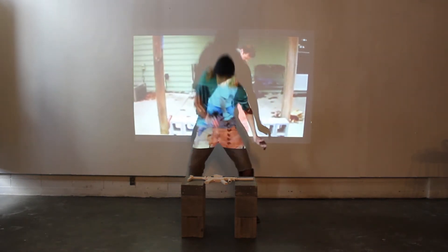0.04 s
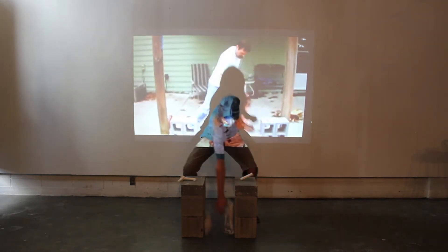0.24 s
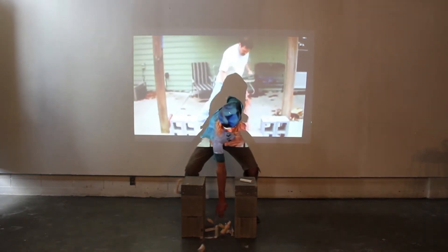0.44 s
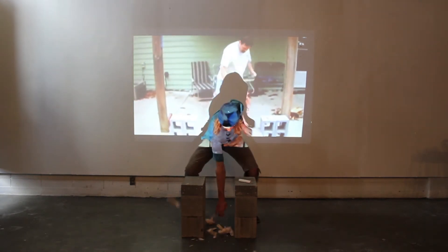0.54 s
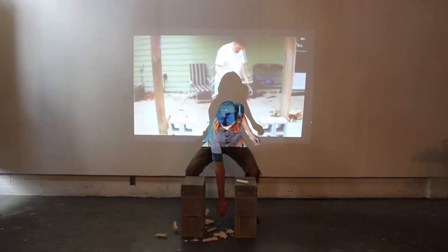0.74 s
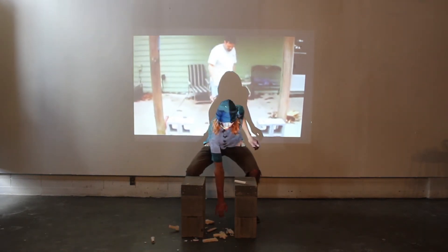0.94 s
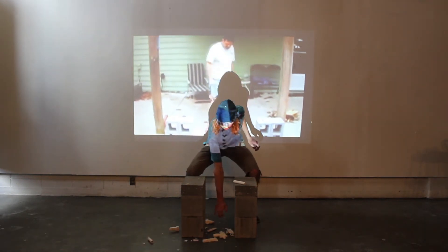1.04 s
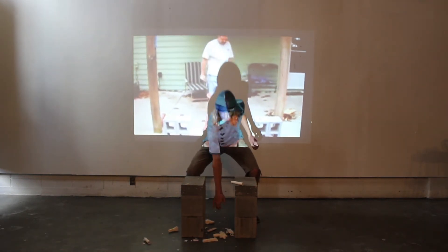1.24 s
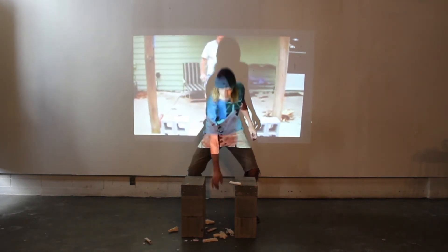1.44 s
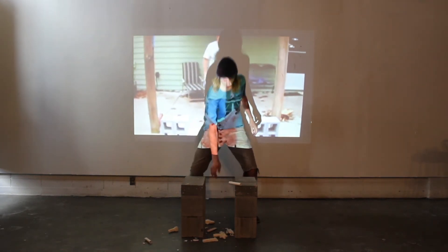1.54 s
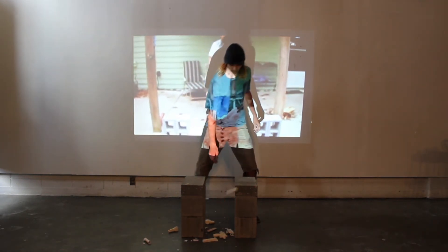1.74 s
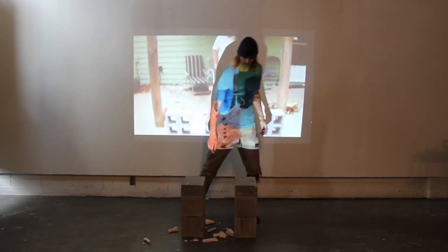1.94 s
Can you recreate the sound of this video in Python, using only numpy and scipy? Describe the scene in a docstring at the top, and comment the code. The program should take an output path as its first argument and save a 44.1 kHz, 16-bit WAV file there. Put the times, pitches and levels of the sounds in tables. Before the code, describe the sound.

A ceramic slab snaps with one sharp crack. Its pieces clatter and ring on a concrete floor, and one small shard bounces on with high clinks. The crack overloads the microphone, briefly dipping the bare, echoing room's low rumble.

```python
"""A bare, echoing room with a concrete floor and a low air rumble. One blow snaps a ceramic slab.
Its pieces land, clatter and ring in their modes; one small shard bounces on with a high clink.
The crack overloads the recorder, whose gain control pushes the rumble down and lets it
swell back as the pieces settle."""
import sys
import numpy as np
from scipy import signal
from scipy.fft import rfft, irfft
from scipy.io import wavfile

SR = 44100
rng = np.random.default_rng(int(sys.argv[2]) if len(sys.argv) > 2 else 0)


def transcribe(signal):
    """Save signal, clipped to [-1, 1], as a 16-bit WAV file at the path in sys.argv[1]."""
    frames = np.atleast_2d(signal).T
    limited = np.clip(frames, -1, 1)
    pcm = np.round(limited * 32767).astype(np.int16)
    wavfile.write(sys.argv[1], SR, pcm)


N = 2 * SR


def amp(db):
    """Decibels to gain."""
    return 10 ** (np.asarray(db) / 20)


def unit_rms(x):
    """Scales to rms 1."""
    return x / np.sqrt(np.mean(x ** 2) + 1e-20)


def curve_at(points, hz):
    """Interpolates a table on a log-frequency axis."""
    points_hz, values = np.transpose(points)
    return np.interp(np.log(hz + 1), np.log(points_hz + 1), values)


def add(mix, start_s, sound):
    """Mixes a sound in at start_s."""
    part = mix[round(start_s * SR):][:len(sound)]
    part += sound[:len(part)]


def smooth(x, lag_s):
    """One-pole lag."""
    pole = np.exp(-1 / (lag_s * SR))
    return signal.lfilter([1 - pole], [1, -pole], x)


# air noise spectrum: (frequency [Hz], relative density [dB])
RUMBLE_SPECTRUM = [(18, -30), (35, -9), (76, -1), (115, -6), (240, 0), (420, -8), (700, -13), (1500, -22),
                   (3500, -31), (8000, -43), (14000, -65)]


def rumble(level_db=-41):
    """Steady low air noise of the room."""
    colour = amp(curve_at(RUMBLE_SPECTRUM, np.fft.rfftfreq(N, 1 / SR)))
    noise = irfft(rfft(rng.standard_normal(N)) * colour, N)
    return amp(level_db) * unit_rms(noise)


# chip on concrete: (frequency [Hz], relative density [dB])
CHIP_SPECTRUM = [(40, -30), (130, -9), (320, -3), (700, -7), (1100, -5), (1700, -2), (3500, 0), (5000, -2),
                 (7000, -4), (8600, -6), (10000, -19), (15500, -32)]


def chip_click(tilt_db_per_oct):
    """One chip's impact: a minimum-phase pulse of energy 1, tilted above 500 Hz."""
    hz = abs(np.fft.fftfreq(2048, 1 / SR))
    octaves = np.log2(np.maximum(hz, 500) / 500)
    log_gain = np.log(amp(curve_at(CHIP_SPECTRUM, hz) + tilt_db_per_oct * octaves))
    spectrum = np.exp(np.conj(signal.hilbert(log_gain)))
    pulse = np.fft.ifft(spectrum).real
    return pulse / np.linalg.norm(pulse)


# slab snapping: (time [s], level [dB], decay [s], tilt [dB/octave])
SNAP = (.2208, 7, .005, -1.5)
# slab crumbling, pieces landing: (time [s], level [dB], decay [s], tilt [dB/octave])
CLATTER = [(.225, 0, .028, .5), (.288, -8, .02, 2), (.305, -6, .018, 2), (.342, -10, .03, 2.5),
           (.39, -16, .03, 0), (.44, -19, .03, -1), (.485, -17, .03, -2), (.514, -14, .04, -1),
           (.55, -17, .02, -2), (.61, -19, .03, -3), (.648, -13, .04, -1.5), (.675, -15, .03, -1.5),
           (.7305, -6, .003, 1), (.735, -11, .025, 0), (.78, -19, .03, -1), (.83, -22, .03, -1),
           (.885, -21, .03, -2), (.919, -9, .003, 1), (.928, -17, .015, -2), (1.082, -22, .004, 1),
           (1.097, -18, .03, -1), (1.2, -29, .03, -1), (1.295, -26, .04, -1), (1.385, -34, .03, -1)]


def chip_burst(level_db, decay_s, tilt_db_per_oct, chips_per_s=2500, spread_db=3.5, grit_db=-5):
    """A dying shower of chips of uneven size, with fine grit between them."""
    t = np.arange(SR // 4) / SR
    sizes = amp(spread_db * np.minimum(rng.exponential(1, len(t)), 4))
    signs = rng.choice([-1, 1], len(t))
    impacts = rng.random(len(t)) < chips_per_s / SR
    chips = unit_rms(sizes * signs * impacts)
    grit = amp(grit_db) * rng.standard_normal(len(t))
    shower = unit_rms(chips + grit) * np.exp(-t / decay_s)
    return amp(level_db) * signal.fftconvolve(shower, chip_click(tilt_db_per_oct))


# modes by piece: (frequency [Hz], relative level [dB])
PIECE_MODES = { "large": [(1843, 0), (1816, -2), (1790, -9), (1730, -13)], "slab": [(2110, -2), (2240, -3),
               (2594, -5), (2828, -1), (2965, 0)], "bar": [(3193, 0), (9680, -30)], "strip": [(5485, 0),
               (5455, -7), (9570, -20)], "wedge": [(5985, 0), (6036, -3)], "splinter": [(6661, 0),
               (6844, -7)], "chip": [(7530, 0), (7612, -10), (10200, -28)], "flake": [(7694, 0), (7660, -9),
               (9740, -26), (12640, -36)], "shard": [(7976, 0), (7700, -11), (10270, -42), (11380, -44),
               (12220, -36), (13720, -48)], "crumb": [(9450, 0), (9510, -5), (9770, -11)]}
# floor strikes: (time [s], piece, level [dB], T60 [s])
STRIKES = [(.29, "wedge", -17, .3), (.345, "wedge", -18, .25), (.347, "shard", -15, .25),
           (.35, "large", -20, .5), (.373, "chip", -17, .25), (.38, "flake", -19, .25),
           (.388, "strip", -22, .5), (.39, "large", -21, .4), (.421, "splinter", -20, .6),
           (.432, "large", -21, .4), (.478, "strip", -21, .6), (.512, "wedge", -17, .35),
           (.522, "slab", -24, .6), (.525, "strip", -20, .4), (.553, "large", -20, .3),
           (.603, "large", -13, .4), (.65, "large", -11, .5), (.66, "slab", -22, .5),
           (.7088, "chip", -4, .16), (.718, "strip", -18, .4), (.732, "flake", -11, .4),
           (.735, "shard", -16, .4), (.752, "flake", -9, .4), (.765, "bar", -17, .8),
           (.778, "large", -16, .9), (.78, "bar", -10, .9), (.818, "chip", -15, .25),
           (.825, "strip", -20, .4), (.835, "large", -19, .9), (.919, "shard", 2, .1),
           (.9195, "flake", -3, .3), (.935, "shard", -8, .45), (1.052, "large", -24, .8),
           (1.0815, "shard", 0, .06), (1.082, "flake", -9, .15), (1.101, "shard", -4, .4),
           (1.2045, "shard", -5, .55), (1.205, "flake", -13, .6), (1.295, "shard", -10, .55),
           (1.372, "crumb", -38, .3), (1.745, "splinter", -62, .5), (1.835, "crumb", -60, .25),
           (1.935, "crumb", -44, .4)]


def piece_ring(piece, level_db, t60_s, contact_s=.0004, tumble_hz=40, tumble_db=2.5):
    """A struck piece rings; its modes flutter because it radiates unevenly as it spins."""
    t = np.arange(SR) / SR
    knots_s = np.arange(200) / tumble_hz
    flutter_onset = 1 - np.exp(-t * tumble_hz)
    modes = np.zeros(len(t))
    for hz, mode_db in PIECE_MODES[piece]:
        flutter = np.interp(t, knots_s, rng.standard_normal(len(knots_s))) * flutter_onset
        envelope = amp(mode_db + tumble_db * flutter - 60 * t / t60_s)
        modes += envelope * np.sin(2 * np.pi * (hz * t + rng.random()))
    attack = 1 - np.exp(-t / contact_s)
    return np.sqrt(2) * amp(level_db) * modes * attack


# room decay: (frequency [Hz], T60 [s])
ROOM_T60 = [(100, 1.0), (500, 1.1), (2000, 1.0), (4000, .9), (8000, .6), (15000, .3)]


def room_echo(x, build_up_s=.006, tap_density=.15):
    """Dense reflections off bare walls, the treble dying first."""
    taps = rng.standard_normal(SR) * (rng.random(SR) < tap_density)
    hz, frame_s, spectra = signal.stft(taps, SR, nperseg=256)
    decay = amp(-60 * frame_s / curve_at(ROOM_T60, hz)[:, None])
    _, tail = signal.istft(spectra * decay, SR, nperseg=256)
    t = np.arange(len(tail)) / SR
    tail *= 1 - np.exp(-(t / build_up_s) ** 2)
    return signal.fftconvolve(x, tail / np.linalg.norm(tail))[:N]


def scene(burst_send_db=2, ring_send_db=-5):
    """Rumble, snap, clatter and ringing pieces in the room; mono."""
    bursts, rings = np.zeros(N), np.zeros(N)
    for start_s, *burst in [SNAP, *CLATTER]:
        add(bursts, start_s, chip_burst(*burst))
    for start_s, *strike in STRIKES:
        add(rings, start_s, piece_ring(*strike))
    echo = room_echo(amp(burst_send_db) * bursts + amp(ring_send_db) * rings)
    return (rumble() + bursts + rings + echo)[None]


def gain_control(x, threshold_db=-30, ratio=4, detect_s=.003, attack_s=.002, recovery_db_per_s=23):
    """Compressor: cuts the gain quickly on loud hits, restores it slowly."""
    power_db = 10 * np.log10(smooth(x[0] ** 2, detect_s) + 1e-12)
    cut_db = (1 - 1 / ratio) * np.maximum(power_db - threshold_db, 0)
    recovery_db = np.arange(N) / SR * recovery_db_per_s
    held_db = np.maximum.accumulate(cut_db + recovery_db) - recovery_db
    return x / amp(smooth(held_db, attack_s))


def record(dry, clip_db=-7, cutoff_hz=16000):
    """Gain control, soft overload, low-pass."""
    ducked = gain_control(dry)
    clipped = ducked / (1 + (ducked / amp(clip_db)) ** 4) ** .25
    lowpass = signal.firwin(255, cutoff_hz, window=("kaiser", 9), fs=SR)
    return signal.oaconvolve(clipped, lowpass[None], "same")


dry = scene()
out = record(dry)
transcribe(out)
```